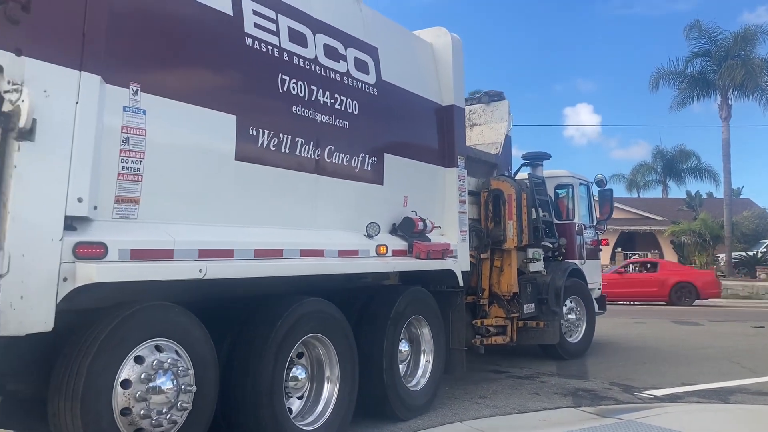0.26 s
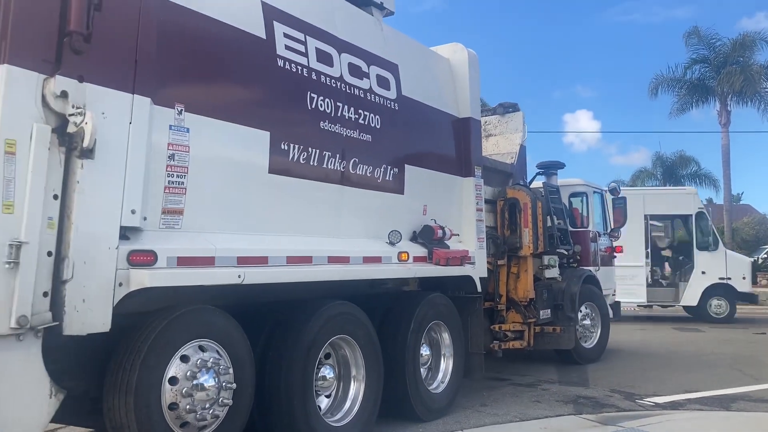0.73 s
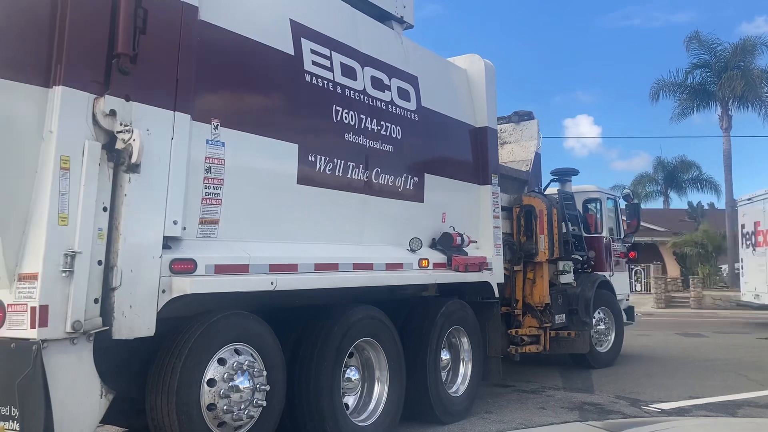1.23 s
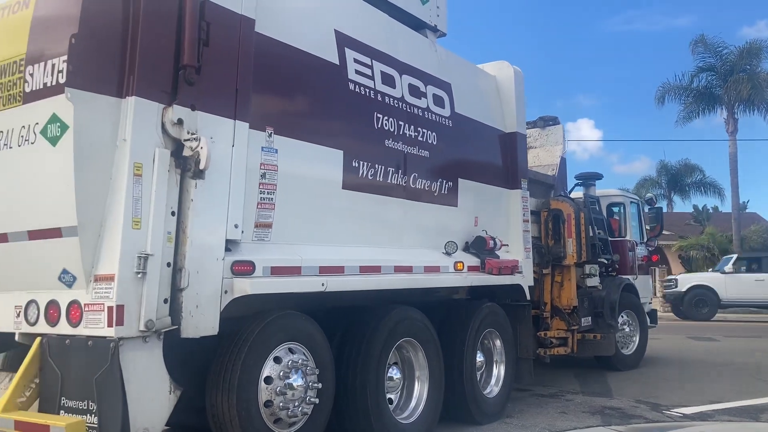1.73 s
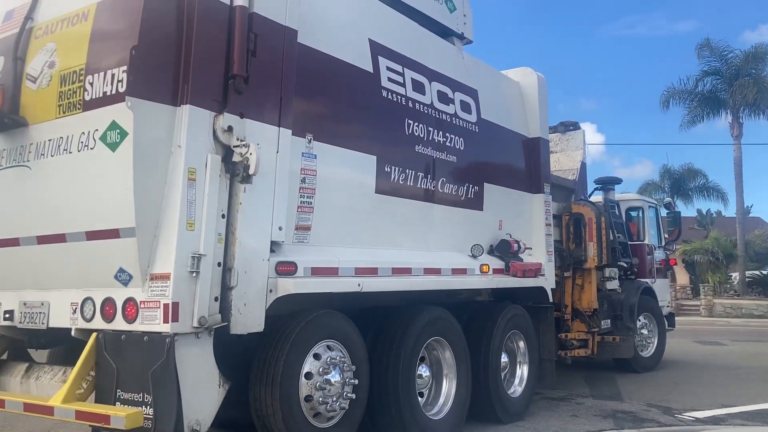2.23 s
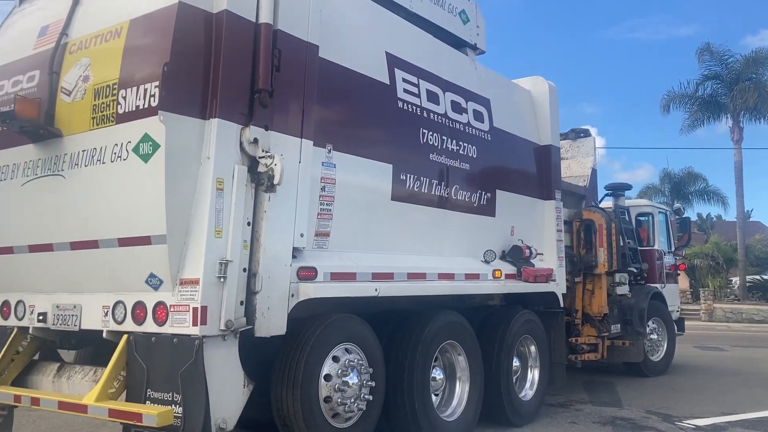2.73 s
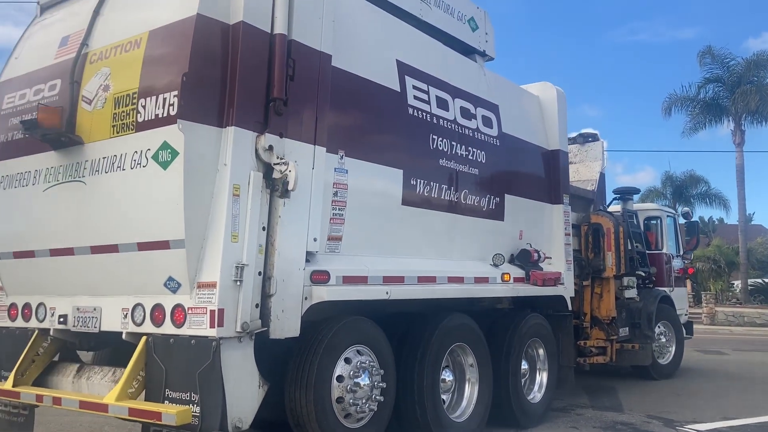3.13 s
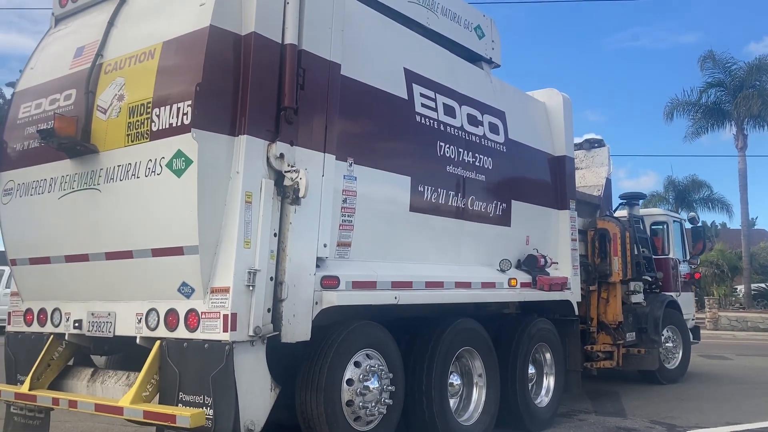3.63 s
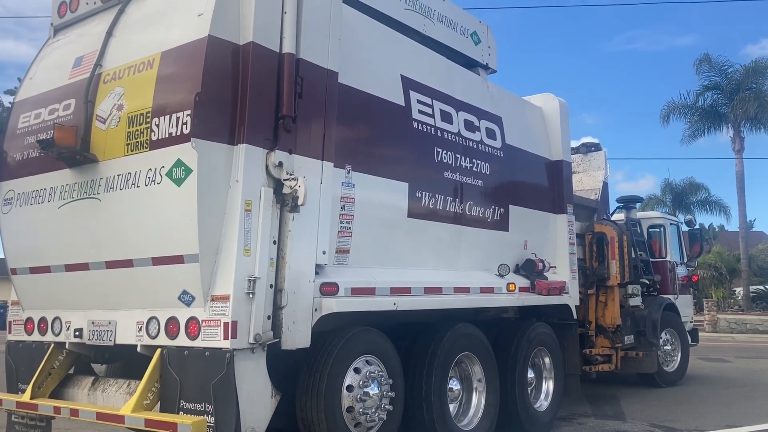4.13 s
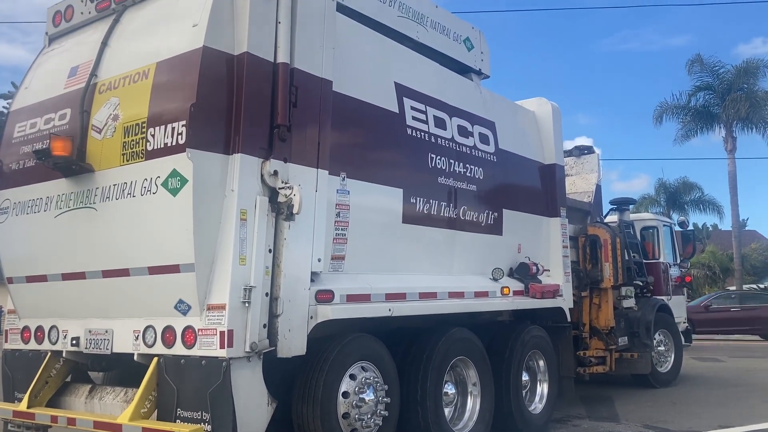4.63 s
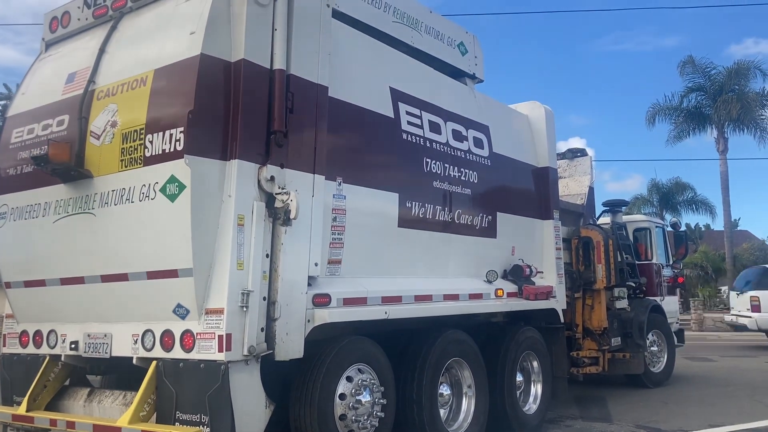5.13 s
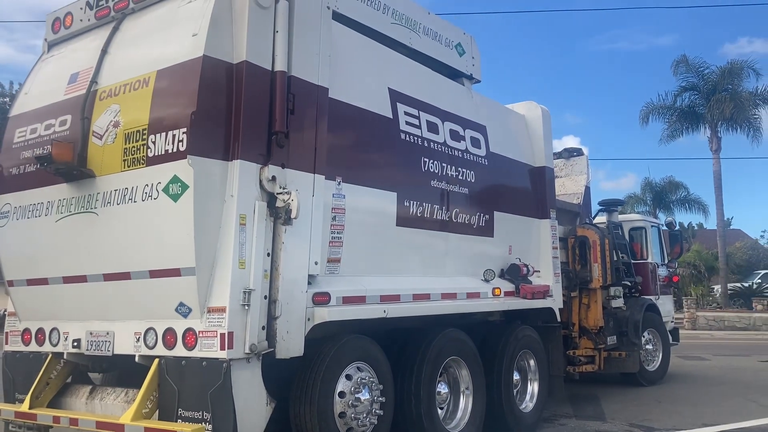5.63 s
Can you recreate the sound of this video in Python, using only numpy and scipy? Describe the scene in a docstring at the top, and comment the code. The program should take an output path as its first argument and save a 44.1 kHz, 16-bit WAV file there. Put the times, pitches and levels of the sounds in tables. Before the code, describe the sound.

A heavy refuse truck is heard close up on a suburban street, through a handheld phone with slightly thin, uneven stereo. A low engine rumble with a wavering drone, boxy whirr and metallic clatter runs throughout. From 0 to about 2.5 seconds, small stones crack sharply under the tyres. Around 0.75 to 1.05 seconds a piercing, trembling brake squeal sounds, with groaning drums, then a bright burst of compressed air with short whistles until 1.35. Vehicles pass ahead near 1.0, 1.7 and 2.5 seconds as brief low swells with falling notes. Between 2.9 and 3.75 seconds several thin high squeals overlap over scraping linings and a faint gear whine; another groan comes near 3.9. At 4.5 to 5.0 a second air release hisses and whistles downward. The engine then takes load, its note sagging while intake roar, fan wash and gear whine grow, as another vehicle passes near 5.1, until the end at about 5.9.

```python
"""The engine of a heavy refuse truck rumbles, drones and clatters as it creeps along a suburban street.
Noise pulsed at the firing rate makes the engine; wavering partials make the drone, and moving resonances the gears.
Brakes groan as resonant noise, squeal as trembling tones and let off air twice as shaped noise; the truck pulls away.
Grit cracks under the tyres as short noise bursts; other vehicles cross ahead as swells of noise and falling notes.
A hand-held phone hears it all with two ports."""
import sys
import numpy as np
from scipy import signal
from scipy.fft import rfft, irfft
from scipy.io import wavfile
from scipy.ndimage import map_coordinates

SR = 44100
rng = np.random.default_rng(int(sys.argv[2]) if len(sys.argv) > 2 else 0)


def unload_wav(signal):
    """Save mono or channel-first audio to the path in sys.argv[1] as 16-bit WAV at rate SR, clipped to [-1, 1]."""
    wavfile.write(
        sys.argv[1],
        SR,
        np.round(np.clip(np.atleast_2d(signal).T, -1, 1) * 32767).astype(np.int16),
    )


N = 258864
TIME = np.arange(N) / SR
FREQS = np.maximum(np.fft.rfftfreq(N, 1 / SR), 1)

# bites of the brakes: hardest_grip_s, half_duration_s, grip (0-1), drum_groan_db
BRAKE_BITES = [(.95, 0.19, 0.7, -36.5), (1.653, 0.44, 0.76, -56), (3.296, 0.36, 0.76, -39),
               (3.93, 0.19, 0.33, -37.5)]


def undb(db):
    """Logarithmic level: decibels become an amplitude gain."""
    return 10 ** (np.asarray(db) / 20)


def unit(x):
    """Power normalisation: scale to an rms of one."""
    return x / np.sqrt(np.mean(x ** 2))


def curves(table):
    """Linear interpolation: the columns of a time table, one value a sample."""
    seconds, *columns = np.transpose(table)
    return [np.interp(TIME, seconds, column) for column in columns]


def ramp(start, end):
    """Raised-cosine transition: a smooth rise from 0 to 1 between two times."""
    progress = np.clip((TIME - start) / (end - start), 0, 1)
    return np.sin(np.pi / 2 * progress) ** 2


def swell(peak_s, half_s):
    """Gaussian envelope: reaches 1 at its peak and 1/e at half_s to either side."""
    return np.exp(-((TIME - peak_s) / half_s) ** 2)


def over_freq(table):
    """Logarithmic frequency scale: join (Hz, value) points on it."""
    hz, value = np.transpose(table)
    return np.interp(np.log(FREQS), np.log(hz), value)


def colour(x, spectrum):
    """Spectral filtering: shape a sound by a spectrum; white noise keeps its level."""
    gain = unit(undb(over_freq(spectrum)))
    return irfft(rfft(x) * gain, N)


def walk(rate):
    """Band-limited chance: random knots, 2 * rate a second, joined by lines and scaled to a spread of one."""
    knots = rng.standard_normal(N // 100)
    return unit(np.interp(2 * rate * TIME, np.arange(len(knots)), knots))


def air():
    """Interaural coherence: mixing mid and side white noise sets how alike the two channels are at each frequency."""
    # likeness of the two ears: frequency_hz, correlation
    likeness = [(60, 0.94), (250, 0.94), (500, 0.8), (850, 0.62), (1400, 0.11), (1900, -0.41), (2500, 0.45),
                (3300, -0.23), (4500, 0.093), (6000, -0.44)]
    mid, side = rfft(rng.standard_normal((2, N)))
    correlation = np.clip(over_freq(likeness), -.99, .99)
    common = mid * np.sqrt((1 + correlation) / 2)
    opposed = side * np.sqrt((1 - correlation) / 2)
    return irfft(common + np.array([[1], [-1]]) * opposed, N)


def scatter(x, t60):
    """Exponential reverberant decay: dense reflections from the road, the truck body and the house fronts."""
    tail = (air() * undb(-60 * TIME / t60))[:, :SR]
    tail /= np.sqrt(np.sum(tail ** 2) / 2)
    return signal.fftconvolve(np.atleast_2d(x), tail, axes=1)[:, :N]


def turns(hz):
    """Phase as the integral of frequency: cycles completed at a moving rate."""
    return np.cumsum(hz) / SR


def puffs(phase, decay):
    """Periodic impulsive excitation: a burst at each whole cycle, decaying by e in a given part of it."""
    return np.exp(-(phase % 1) / decay)


def ragged(x, depth_db, spacing_hz, drift=2):
    """Interference: echoes off panels and road add drifting peaks and dips, others for each ear."""
    hz, seconds, cells = signal.stft(x, SR, nperseg=4096)
    place = np.meshgrid(hz / spacing_hz, seconds * drift, indexing="ij")
    fields = rng.standard_normal(size=(2, 1200, 40))
    heights = np.array([map_coordinates(field, place, order=1, mode="wrap") for field in fields])
    gain = unit(undb(depth_db * np.tanh(heights)))
    return signal.istft(cells * gain, SR)[1][:, :N]


def rush(hz, width_hz):
    """Turbulent excitation of a resonance: low-passed noise is shifted to a centre that may move."""
    pole = np.exp(-2 * np.pi * width_hz / SR)
    slow = signal.lfilter([1], [1, -2 * pole, pole ** 2], rng.standard_normal((2, 2, N)))
    phase = 2 * np.pi * turns(hz * np.ones(N))
    mid, side = slow[0] * np.cos(phase) + slow[1] * np.sin(phase)
    return unit(mid + np.array([[.7], [-.7]]) * side)


def engine(load, grip, firing_depth=1.0, unsteady_db=1.48):
    """Amplitude modulation by combustion: six cylinders fire three times a turn; knocks and taps clatter."""
    # level of the body's boom: time_s, level_db
    boom_level = [(0, -34.5), (1.1, -33.5), (1.5, -38), (1.7, -30), (2.15, -38), (3.7, -38.5), (4.6, -35.5),
                  (5.2, -33), (5.87, -34)]
    # spectra of exhaust rumble, body boom, whirr and valve clatter: frequency_hz, relative_db_per_hz
    rumble_spectrum = [(20, -43), (30, -15), (38, -11.5), (60, 1.5), (85, -0.5), (125, 2), (160, -2),
                       (205, -4), (250, -4.5), (310, -7.5), (390, -16), (550, -79)]
    boom_spectrum = [(220, -31), (340, -4), (430, 5), (500, 1.5), (620, -7), (780, -9), (1100, -82)]
    whirr_spectrum = [(450, -8), (640, -9), (790, -2.5), (1000, 1), (1250, -4), (1550, -15.5),
                      (2200, -24.5), (4000, -53)]
    clatter_spectrum = [(800, -30), (1400, 0.5), (1850, 3), (2400, -4.5), (3000, -5.5), (3600, -8.5),
                        (4500, -10.5), (5600, -18.5), (8000, -19), (11000, -28.5), (13000, -42),
                        (15000, -68)]

    idle_hz, load_sag_hz = 13.4, .95
    crank = turns((idle_hz - load_sag_hz * load) * (1 + .012 * walk(3)))
    firing = unit(1 + firing_depth * puffs(3 * crank, 1.0))
    rumble = colour(air() * firing, rumble_spectrum) * undb(-25 - .2 * load)
    boom = colour(air() * firing, boom_spectrum) * undb(curves(boom_level)[0])
    whirr_db = -35 + 1.8 * load + 2.5 * grip + unsteady_db * walk(6.5)
    whirr = colour(air(), whirr_spectrum) * undb(whirr_db)

    # one knock a turn from the air compressor, and two lighter valve taps
    taps = .36 * puffs(crank, .3) + .25 * puffs(2 * crank, .15)
    tap_scatter_db = 6 * np.tanh(walk(28))
    rattle = unit(1 + taps * undb(tap_scatter_db))
    clatter_db = -40.5 + 1.7 * load + 4 * grip
    clatter = colour(air() * rattle, clatter_spectrum) * undb(clatter_db)

    body = ragged(boom + whirr, depth_db=6.0, spacing_hz=23.91, drift=1.28)
    return rumble + body + ragged(clatter, depth_db=7.5, spacing_hz=69.26, drift=3.524)


def drone(load, waver=0.0121, rough_db=2.5):
    """Additive synthesis: wavering partials of a low note that sags as the truck creeps, and again under load."""
    # level of the whole note: time_s, level_db
    drone_level = [(0, -34.5), (.5, -26.5), (1, -36), (1.25, -30.5), (3.7, -30.5), (4.2, -27), (5.2, -32),
                   (5.45, -24.5), (5.87, -25.5)]
    # partials: multiple_of_pitch, relative_level_db
    partial_table = [(.68, -10.5), (.87, -5), (1, 2), (1.5, -19), (2, -11.5), (2.66, -11), (3.08, -13)]
    pitch_hz = 97.37 - 6.3 * ramp(1.8, 3.7) - 2.615 * load
    note = np.zeros(N)
    for multiple, part_db in partial_table:
        gain = undb(part_db + rough_db * walk(17.0))
        cycles = turns(multiple * pitch_hz * (1 + waver * walk(6.83)))
        note += gain * np.sin(2 * np.pi * cycles)
    return note * undb(curves(drone_level)[0])


def driveline(load):
    """Narrow-band noise: gear mesh follows road speed and drive; load adds intake roar, fan wash and turbo hiss."""
    # gear mesh: time_s, centre_hz, level_db
    gear_mesh = [(1.8, 1105, -73), (2.8, 1226, -39), (3.4, 1284, -41), (4.3, 1250, -51), (4.7, 1265, -41.5),
                 (5.3, 1505, -45), (5.87, 1516, -46)]
    gear_hz, gear_db = curves(gear_mesh)
    gears = rush(gear_hz, width_hz=86) * undb(gear_db)
    # centres rise and levels grow with load; the decibels are those at full load
    intake = rush(1190 + 260 * load, width_hz=280) * load * undb(-41)
    turbo = rush(3910 + 900 * load, width_hz=1600) * load ** 2 * undb(-54)
    fan = rush(2350, width_hz=370) * load * undb(-50.5)
    return gears + intake + fan + turbo


def brake_drag(load, grain_db=4.0, loose_db=-72):
    """Dry friction: linings scrape with a grainy hiss; drums groan faintly until the pull, and more as they bite."""
    # scrape of the linings: frequency_hz, relative_db_per_hz
    scrape_spectrum = [(3000, -6), (5500, 7), (7000, 1), (8500, 2.5), (11000, -4.5), (13000, -10),
                       (15000, -71)]
    fading = undb(-51.5 - 1.6 * TIME)  # the shoes drag ever more lightly
    contact = fading * (1 - ramp(2.95, 4.5)) + undb(loose_db)
    grain = unit(undb(grain_db * walk(250)))
    scrape = colour(air() * grain, scrape_spectrum) * contact
    groan = undb(-42) * (1 - load)
    for peak_s, half_s, _, groan_db in BRAKE_BITES:
        groan = groan + undb(groan_db) * swell(peak_s, half_s)
    return scrape + rush(809, width_hz=112) * groan


def stick_slip(hz, size, waver=0.0016, flutter_db=2.3, rasp_db=1.2):
    """Self-excited friction: one drum mode sounds, trembling in pitch and level as the lining catches and slips."""
    t, knots = np.arange(len(hz)) / SR, np.arange(N // 100)
    tremble, flutter, rasp = (
        np.interp(t * per_s, knots, rng.standard_normal(len(knots))) for per_s in (110, 70, 500))
    level = size * undb(flutter_db * flutter + rasp_db * rasp)
    return level * np.exp(2j * np.pi * turns(hz * (1 + waver * tremble)))


def squeals(edge=0.016, arch_db=8, wet_db=-11):
    """Modal radiation: one long squeal as the brakes bite, and short arched ones; their echoes beat against them."""
    # long squeal of the first bite: time_s, pitch_hz, level_db
    long_squeal = [(.731, 9030, -30), (.758, 9040, -21.5), (.8, 9075, -32), (.865, 9085, -25),
                   (.935, 9100, -32), (.972, 9030, -21), (1.0, 9005, -33), (1.035, 8990, -32)]
    # short squeals: start_s, length_s, pitch_hz, glide_hz, upward_bend_in_middle_hz, peak_db
    short_squeals = [(.367, .03, 5210, 30, 50, -40), (.755, .052, 4900, -70, 30, -41.5),
                     (.82, .175, 14420, -100, 0, -38), (.845, .08, 8325, -17, 10, -38),
                     (1.21, .07, 14600, 30, 0, -50), (1.69, .05, 11320, 0, 0, -53),
                     (2.445, .06, 11300, 0, 0, -50), (2.525, .03, 5160, 30, 50, -47),
                     (2.878, .1, 4950, 0, 90, -43), (2.888, .04, 8770, 30, 0, -32),
                     (2.955, .075, 8825, 40, 0, -39), (2.99, .42, 13950, 210, 0, -45),
                     (3.02, .1, 8860, 50, 0, -46), (3.03, .34, 11870, -150, 0, -55),
                     (3.09, .22, 9320, 25, 0, -37), (3.11, .18, 9105, 60, -15, -31.5),
                     (3.125, .1, 11320, -20, 0, -53), (3.28, .095, 9200, 45, 0, -37),
                     (3.28, .45, 9352, 30, 0, -44), (3.58, .16, 13730, 65, 20, -44.5),
                     (3.585, .125, 9060, 45, 10, -30), (3.595, .13, 10585, 65, 0, -39.5),
                     (3.65, .1, 12990, 20, 0, -53), (3.85, .04, 11300, 0, 0, -48),
                     (4.88, .1, 14590, -15, 0, -54), (5.7, .2, 15490, 0, 0, -60)]
    hz, db = curves(long_squeal)
    first, last = long_squeal[0][0], long_squeal[-1][0]
    rise = ramp(first - edge / 2, first + edge / 2)
    fall = 1 - ramp(last - edge / 2, last + edge / 2)
    out = stick_slip(hz, undb(db) * rise * fall)
    for start, length, pitch_hz, glide_hz, bend_hz, peak_db in short_squeals:
        span = (TIME > start - edge) & (TIME < start + length + edge)
        t = TIME[span] - start
        hold = np.clip(np.minimum(t, length - t) / edge + .5, 0, 1)
        slack = (2 * t / length - 1) ** 2  # 0 in the middle, 1 at the ends
        hz = pitch_hz + glide_hz * t / length - bend_hz * slack
        size = undb(peak_db - arch_db * slack) * np.sin(np.pi / 2 * hold) ** 2
        out[span] += stick_slip(hz, size)
    # the two ears hear the tones a quarter cycle apart
    direct = np.sqrt(2) * np.array([out.real, out.imag])
    return direct + undb(wet_db) * scatter(direct, 0.16)


def jet(spurts, shut_s, sag_db_per_s, close_s):
    """Pressure discharge: each spurt swells, sags as the pressure drops, and dies when the port shuts."""
    hiss = 0
    for start, rise, db in spurts:
        opening = np.clip((TIME - start) / rise, 0, 1)
        spent = np.maximum(TIME - start - rise, 0)
        hiss = np.hypot(hiss, opening * undb(db - sag_db_per_s * spent))
    return hiss * np.exp(-np.maximum(TIME - shut_s, 0) / close_s)


def whistles():
    """Flow-excited resonance: escaping air sounds the ports in short, breathy notes, most of them sliding."""
    # whistles: peak_s, half_duration_s, pitch_hz, slide_hz (either way), width_hz, level_db
    port_notes = [(0.855, .035, 4570, 290, 150, -45), (.95, 0.029, 4300, -150, 220, -47),
                  (1.157, 0.021, 3720, -21, 85, -35.5), (1.15, .06, 8800, 1, 110, -42),
                  (1.155, 0.038, 10480, -2, 120, -50), (1.243, 0.022, 3790, -30, 130, -45),
                  (1.27, 0.037, 8800, 0, 330, -50), (1.282, 0.044, 7800, 82, 220, -40),
                  (4.645, .06, 4230, -70.5, 110, -39.5), (4.68, 0.12, 4960, -100, 330, -46),
                  (4.785, 0.081, 4050, -59.5, 200, -40), (4.78, .07, 8900, 0, 120, -49),
                  (4.78, 0.059, 10540, 2, 90, -49)]
    out = np.zeros((2, N))
    for peak_s, half_s, pitch_hz, slide_hz, width_hz, db in port_notes:
        hz = pitch_hz + slide_hz * np.tanh((TIME - peak_s) / half_s)
        out += rush(hz, width_hz) * undb(db) * swell(peak_s, half_s)
    return out


def air_brakes(flutter_db=1.4, wet_db=-3.0):
    """Turbulent jet noise: compressed air rushes through two ports, each with its own colour, and whistles."""
    # spurts from the brake valve, then from the exhaust port: start_s, rise_s, level_db
    valve_spurts = [(.9, 0.035, -34.5), (1.075, 0.06, -32.5), (1.205, 0.07, -38.5)]
    vent_spurts = [(4.495, 0.049, -35.5), (4.578, 0.024, -31.5), (4.73, 0.05, -42.5)]
    # their spectra: frequency_hz, relative_db_per_hz
    valve_spectrum = [(900, -20), (1600, 4.5), (2200, 1), (3100, -0.5), (4000, 2), (5000, -1), (5900, -1),
                      (7000, -5), (7900, 0.5), (9000, -1), (10000, -3), (11000, -3), (12600, -14),
                      (13700, -11.5), (14500, -24), (15500, -36)]
    vent_spectrum = [(1200, -32), (2100, -2), (3200, -11), (4200, -2.5), (5200, -7), (6000, -14.5),
                     (7300, -15.5), (8500, -6), (9600, -10), (10700, -5.5), (12400, -26), (13700, -25),
                     (15500, -52)]

    hiss = jet(valve_spurts, shut_s=1.308, sag_db_per_s=53, close_s=0.032)
    sputter = undb(1.5 * walk(120))
    valve = colour(air(), valve_spectrum) * hiss * sputter
    valve = ragged(valve, depth_db=4.0, spacing_hz=166.6, drift=13.7)

    hiss = jet(vent_spurts, shut_s=4.97, sag_db_per_s=66, close_s=0.1)
    flutter = undb(flutter_db * walk(29))
    vent = colour(air(), vent_spectrum) * hiss * flutter
    vent = ragged(vent, depth_db=5.0, spacing_hz=85.4, drift=5.6)
    return valve + vent + undb(wet_db) * scatter(valve + vent, 0.1) + whistles()


def grit(decay=0.0035, wet_db=-8, count=14):
    """Impulsive fracture: stones snap under the tyres in cracks of a few milliseconds, with finer ones at random."""
    # loudest cracks: time_s, level_db
    loud_cracks = [(.018, -31), (.029, -31.5), (.185, -36), (.303, -43), (.327, -31), (.418, -29.5),
                   (.473, -34), (.484, -34), (.633, -34), (.752, -34), (.793, -29), (1.41, -33),
                   (1.561, -32.5), (1.67, -31), (1.681, -34), (1.687, -29), (1.848, -35), (2.02, -31.5),
                   (2.088, -34), (2.19, -36), (2.535, -37), (3.132, -36), (3.65, -42)]
    # crack: frequency_hz, relative_db_per_hz
    crack_spectrum = [(800, 10.5), (2500, -17), (4000, 6.5), (5000, -3), (6000, -2.5), (8000, -5.5),
                      (11000, -8.5), (15000, -41)]
    fine_s = 2.3 * rng.random(count)
    fine_db = -47 + 4 * rng.uniform(-1, 1, count)
    snaps = np.zeros(N)
    for s, db in [*loud_cracks, *zip(fine_s, fine_db)]:
        snaps[int(s * SR)] += undb(db)
    envelope = signal.lfilter([1], [1, -np.exp(-1 / (decay * SR))], snaps)
    direct = colour(air() * envelope, crack_spectrum)
    return direct + undb(wet_db) * scatter(direct, 0.22)


def traffic(glide=.011):
    """Doppler shift: each vehicle swells as it clears the cab; its rough note falls, the more the faster it goes."""
    # vehicles crossing ahead: passing_s, half_duration_s, tyre_db, note_hz, note_db
    passing_vehicles = [(0.21, 0.44, -53, 431, -48), (1.007, 0.25, -32.5, 234, -41),
                        (1.727, .12, -30, 174.3, -24), (2.508, .17, -58, 140.9, -31.5),
                        (5.067, 0.42, -36, 553.5, -43.5)]
    # tyre noise: frequency_hz, relative_db_per_hz
    tyre_spectrum = [(60, -30), (150, 10), (220, 5.5), (330, 4.5), (520, -12), (700, -26), (1100, -25),
                     (2000, -38), (5000, -47)]
    tyres, notes = np.zeros(N), np.zeros(N)
    for passing_s, half_s, tyre_db, note_hz, note_db in passing_vehicles:
        place = (TIME - passing_s) / half_s
        near = 1 / (1 + place ** 2)
        pitch = note_hz * (1 - glide * np.tanh(place / 2) / half_s ** 2 / 4)
        tone = np.sin(2 * np.pi * turns(pitch))
        roughness = .85 * rush(pitch, width_hz=22).mean(axis=0)
        tyres += undb(tyre_db) * near
        notes += undb(note_db) * near * (tone + roughness)
    return tyres * colour(air(), tyre_spectrum) + notes


def scene():
    """Superposition: load and grip drive the truck, the street is added, and the bass leans to the right."""
    load = ramp(4.5, 5.6)  # pulling away
    grip = sum(strength * swell(peak_s, half_s) for peak_s, half_s, strength, _ in BRAKE_BITES)
    truck = engine(load, grip) + drone(load) + driveline(load)
    truck = truck + brake_drag(load) + squeals() + air_brakes()
    pan_db = 1.7 / (1 + (FREQS / 200) ** 2)  # level difference between the ears
    pan = undb(np.array([[-.5], [.5]]) * pan_db)
    return irfft(rfft(truck + grit() + traffic()) * pan, N)


def record(dry):
    """Phase delay: one port's treble feeds both sides with a small lag between them; the top is cut."""
    split_hz, zero_phase_hz, hz_per_turn = 6200, 6880, 4500
    top_hz, fade_s = 15550, .004
    both = rfft(dry * ramp(0, fade_s) * (1 - ramp(N / SR - fade_s, N / SR)))
    phase = -2 * np.pi * (FREQS - zero_phase_hz) / hz_per_turn
    both[1] = np.where(FREQS > split_hz, both[0] * np.exp(-1j * phase), both[1])
    low_pass = signal.ellip(8, .2, 70, top_hz, fs=SR, output="sos")
    return signal.sosfilt(low_pass, irfft(both, N))


dry = scene()
out = record(dry)
unload_wav(out)
```